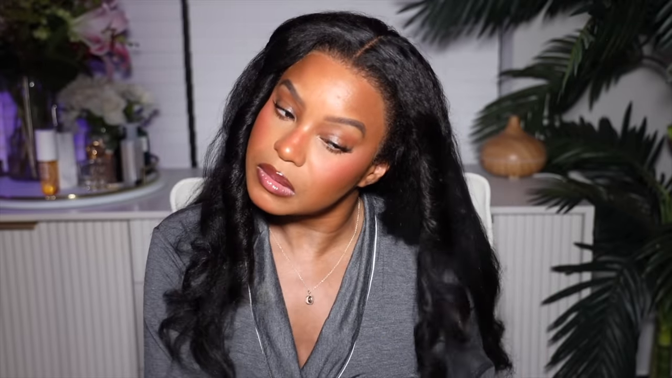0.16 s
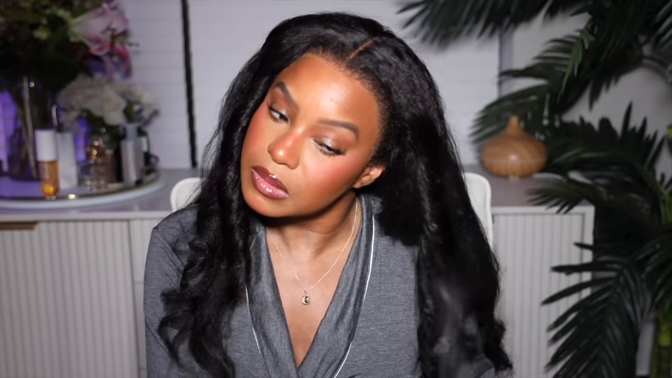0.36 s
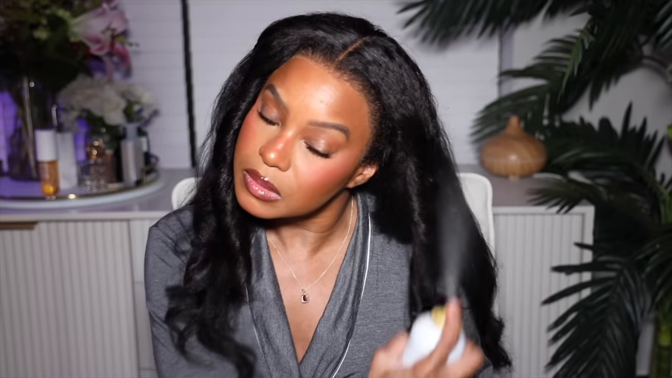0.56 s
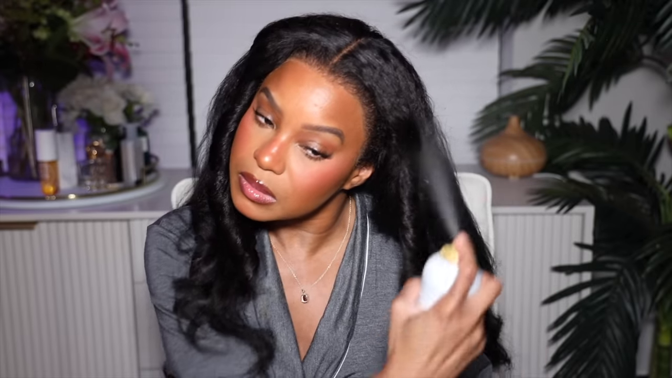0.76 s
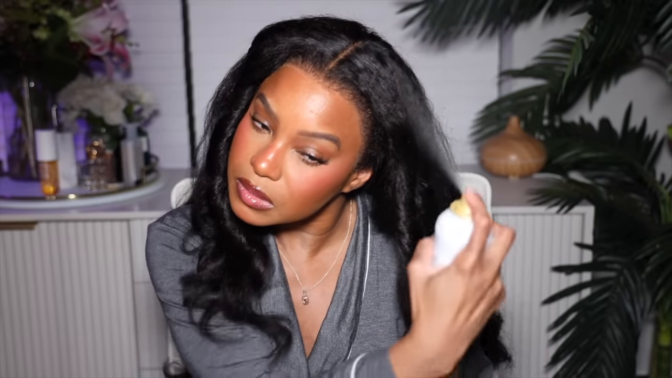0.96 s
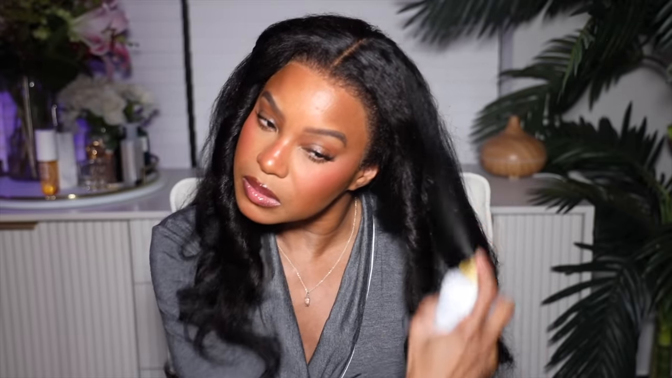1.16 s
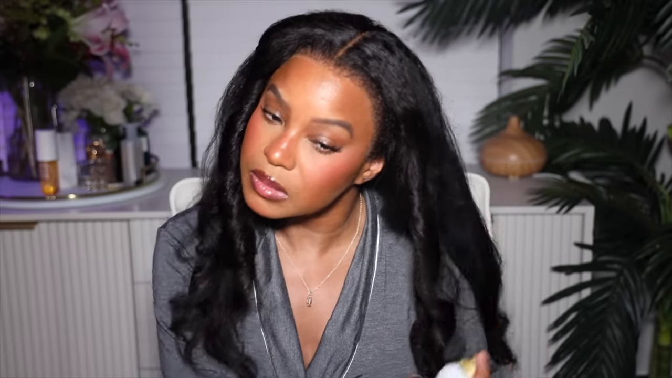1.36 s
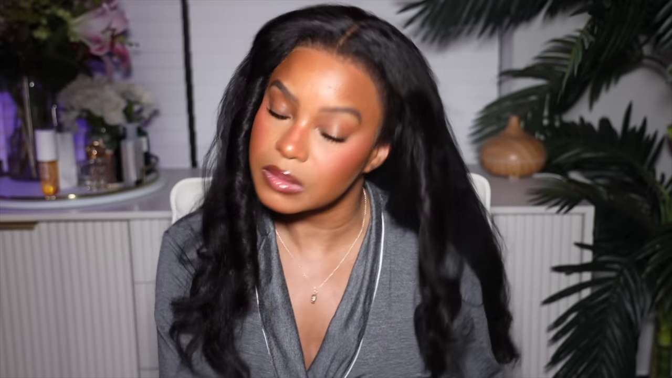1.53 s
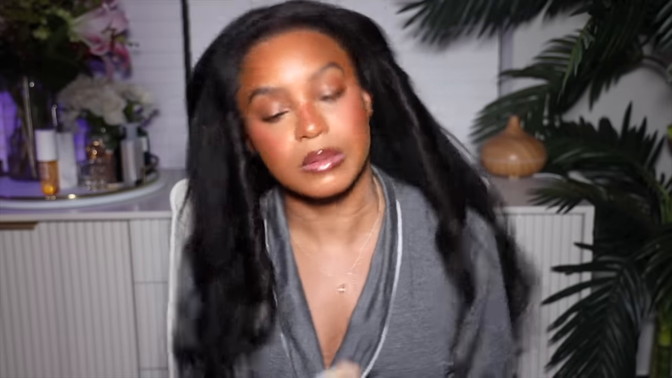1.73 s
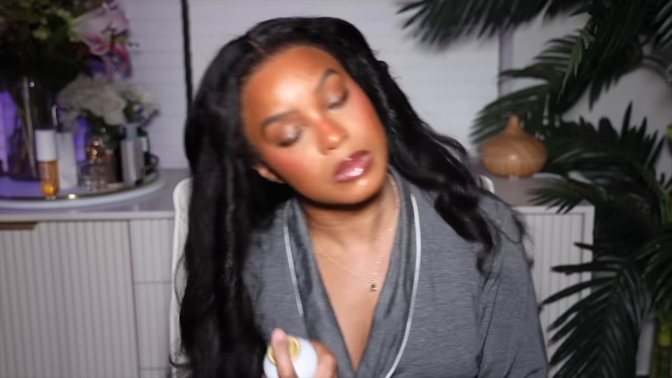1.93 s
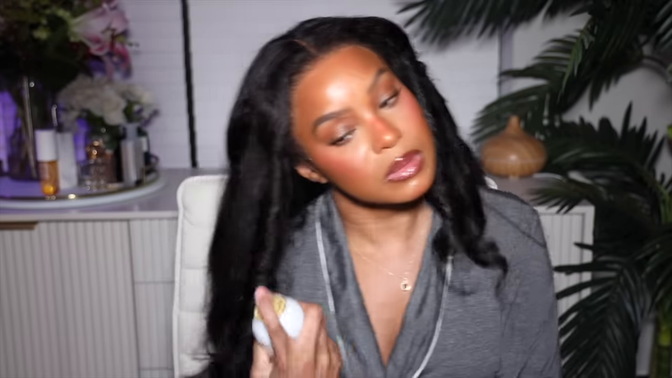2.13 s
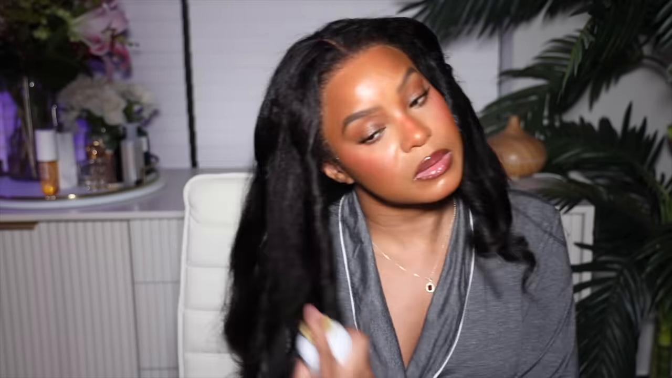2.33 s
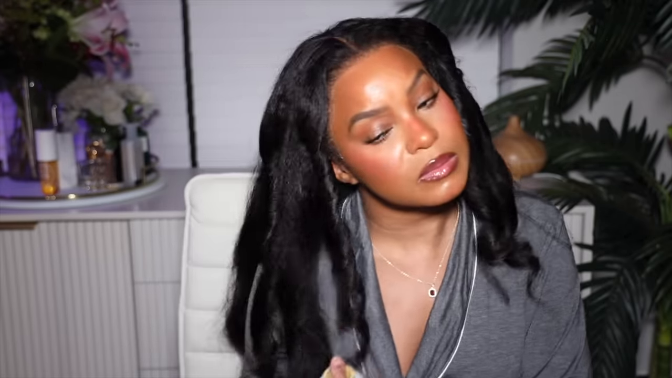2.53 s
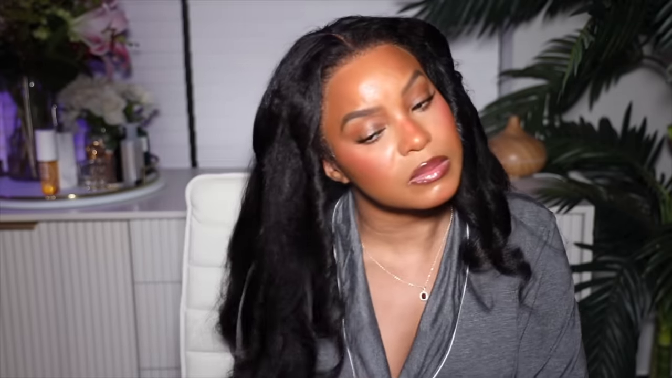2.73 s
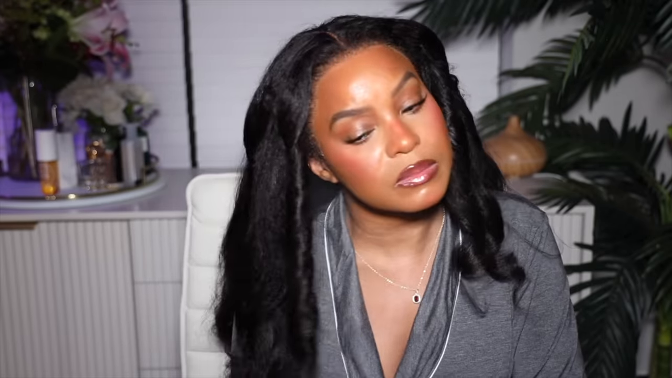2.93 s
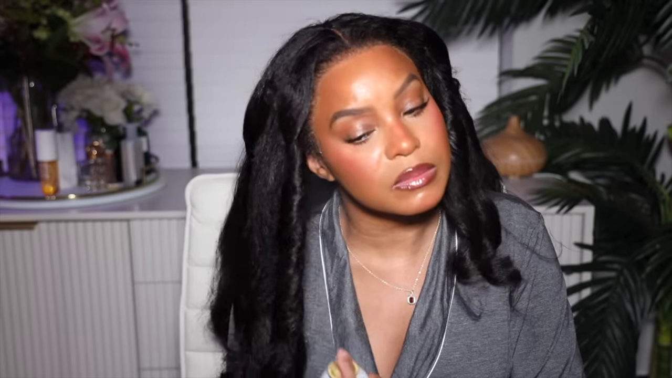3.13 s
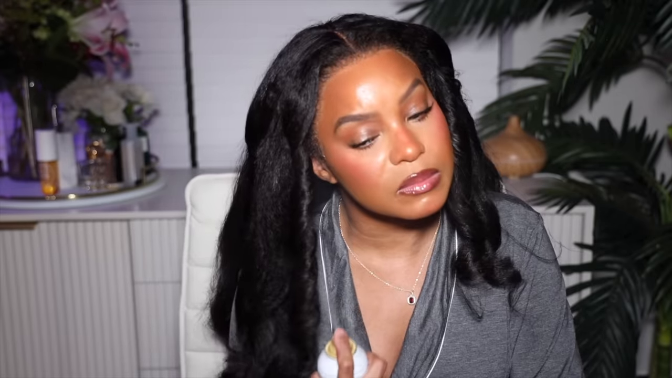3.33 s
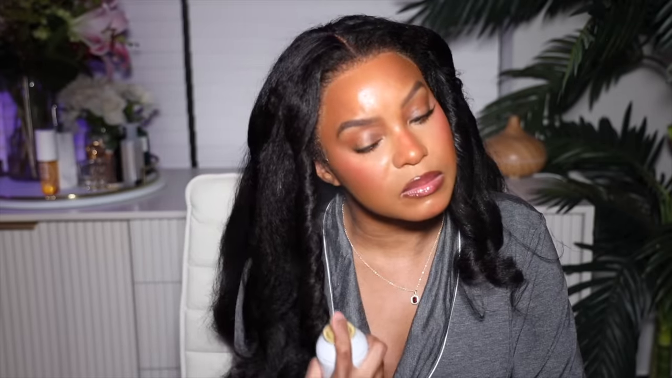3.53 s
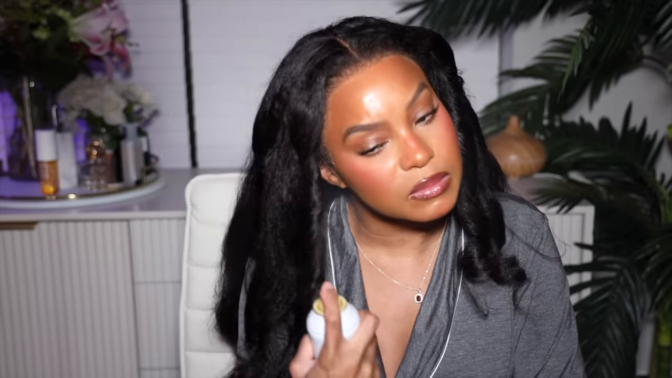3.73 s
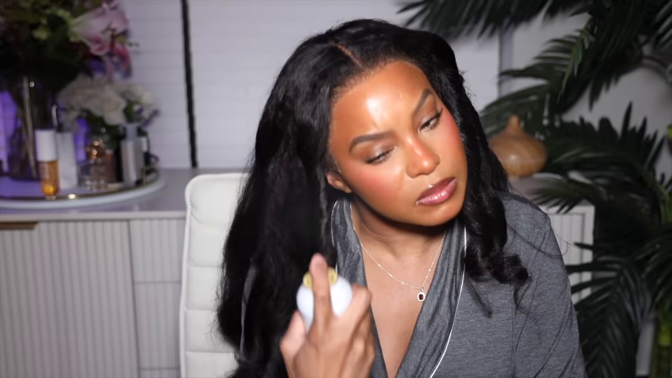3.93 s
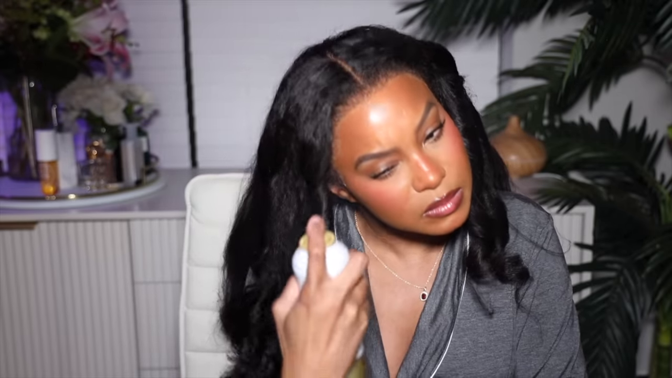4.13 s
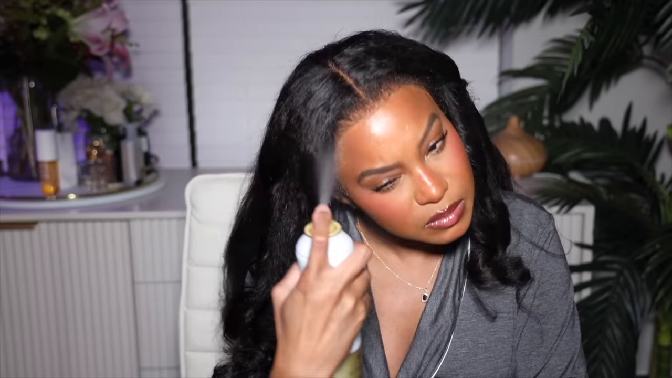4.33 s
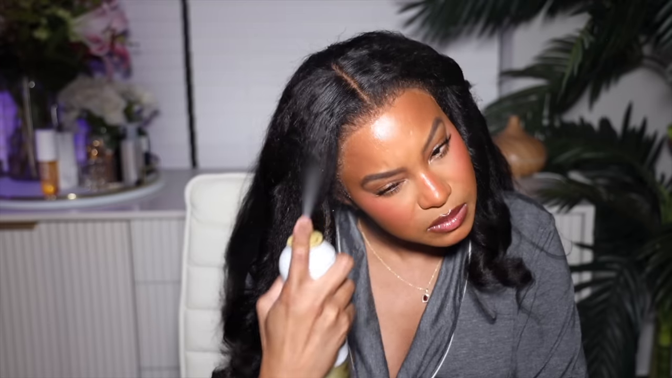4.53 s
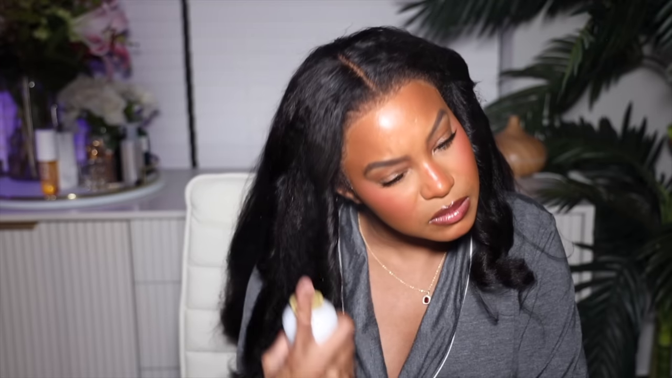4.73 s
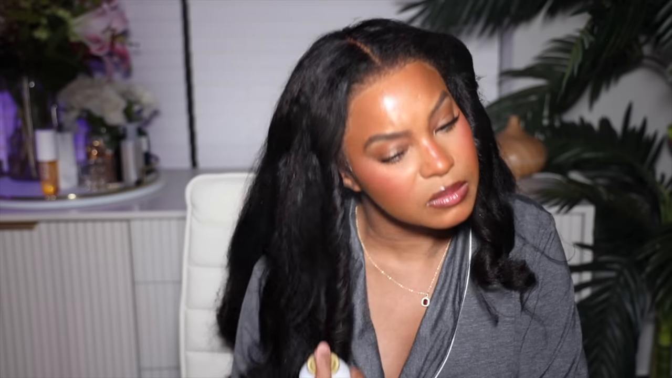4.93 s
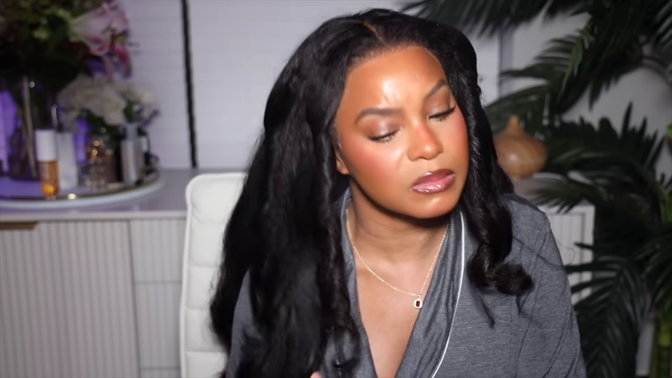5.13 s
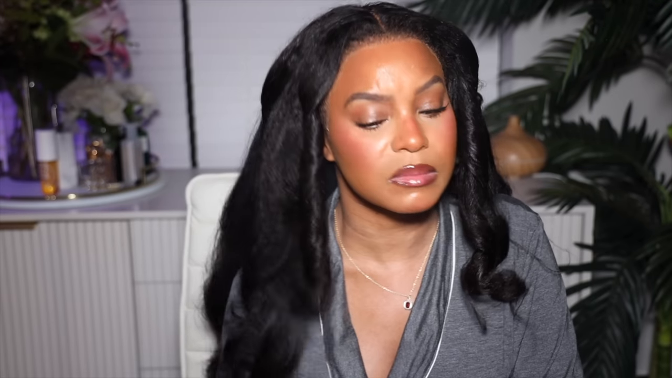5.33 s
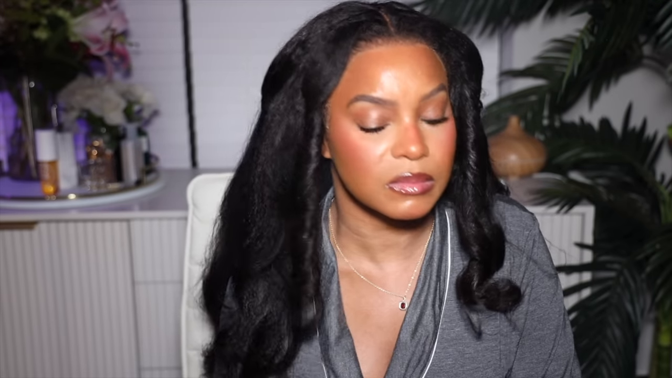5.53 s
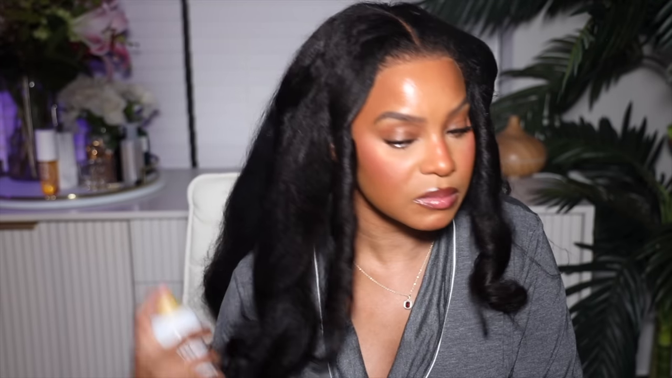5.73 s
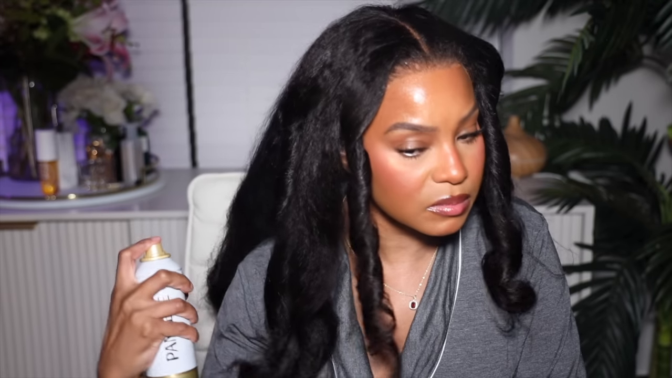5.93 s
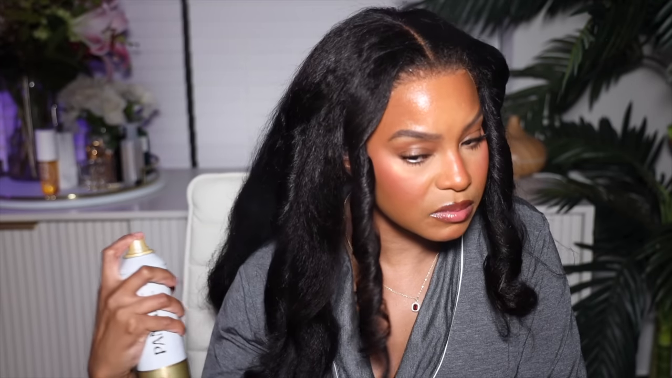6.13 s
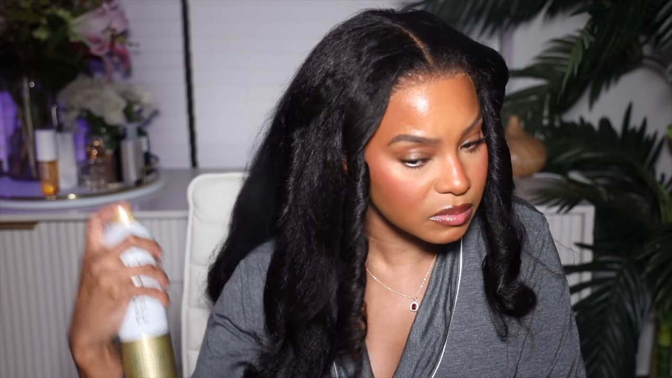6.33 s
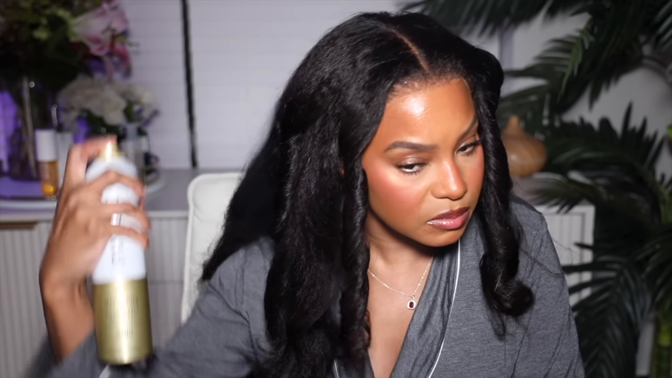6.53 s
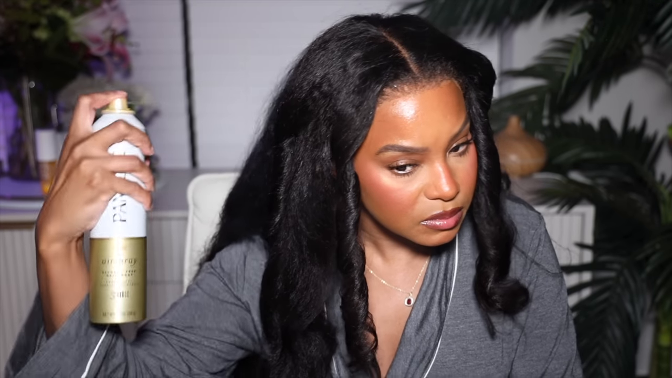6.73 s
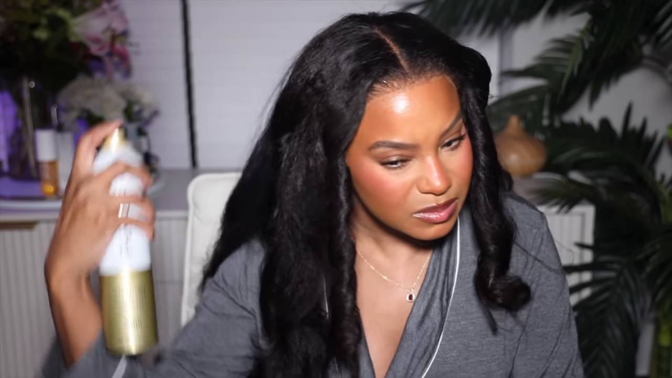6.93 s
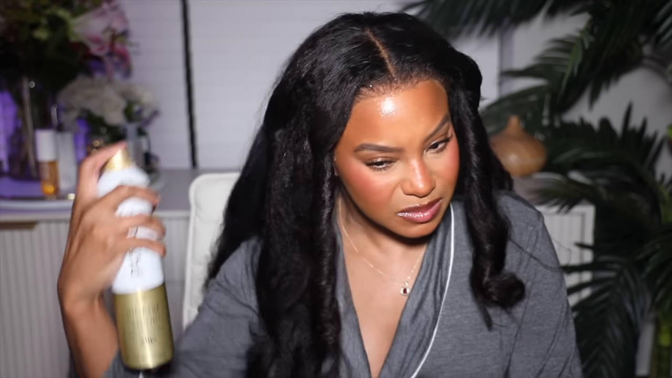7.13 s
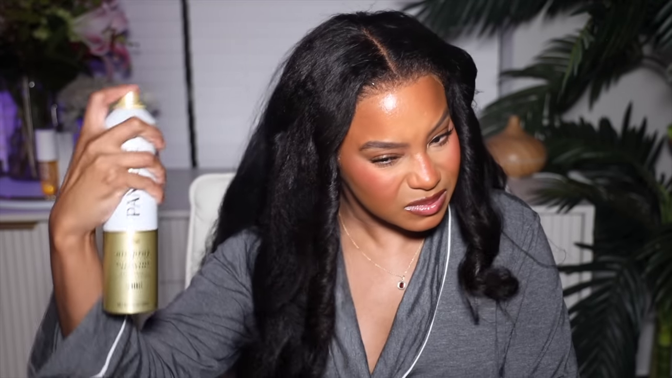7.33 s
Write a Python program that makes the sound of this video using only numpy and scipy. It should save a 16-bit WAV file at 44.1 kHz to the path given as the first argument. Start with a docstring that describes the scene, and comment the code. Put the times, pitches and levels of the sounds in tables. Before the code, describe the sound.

An aerosol can of hairspray fires a run of short, bright hissing bursts, about four a second. In a pause, hair and cloth rustle and the can bumps and clinks as it changes hands. The cap clicks and a longer run of bursts follows, then a brief gap and a last, slightly throatier run. The sound is close and mono, in a small room with a faint low hum.

```python
"""Hairspray in a small room

Short bursts, close and in mono. Each press cracks the valve to a thin hiss and opens it to a roaring jet,
trailed by a quieter hiss; near reflections sweep as the can moves. Hair and robe rustle, the plastic cap
clicks, and after the first of three runs the can clinks as it changes hands."""
import sys
import numpy as np
from scipy import signal
from scipy.fft import rfft, irfft, next_fast_len
from scipy.io import wavfile
from scipy.ndimage import map_coordinates

SR = 44100
rng = np.random.default_rng(int(sys.argv[2]) if len(sys.argv) > 2 else 0)


def store_wav(level_fs):
    """Save 16-bit WAV to argv[1]."""
    pcm = np.round(np.clip(np.atleast_2d(level_fs), -1, 1) * 32767)
    wavfile.write(sys.argv[1], SR, pcm.T.astype(np.int16))


N = 329427
TIME_S = np.arange(N) / SR
AGE_S = TIME_S[:SR // 2]  # clock of one event


def undb(db):
    """Decibels to gain."""
    return 10 ** (np.asarray(db) / 20)


def unit_rms(x):
    """Scale to an rms of one."""
    return x / np.sqrt(np.mean(x ** 2))


def highpass(hz, order=2):
    """Butterworth high-pass sections."""
    return signal.butter(order, hz, "high", fs=SR, output="sos")


def add(track, start_s, sound):
    """Mix a short sound into a track."""
    part = track[int(start_s * SR):][:len(sound)]
    part += sound[:len(part)]


def noise(spectrum, size=N):
    """Unit-rms noise shaped by rows of freq_hz, density_db."""
    freq_hz, density_db = np.transpose(spectrum)
    padded = next_fast_len(size, True)
    bin_hz = np.arange(padded // 2 + 1) * SR / padded
    gain = undb(np.interp(np.log(bin_hz + 1), np.log(freq_hz), density_db))
    return unit_rms(irfft(rfft(rng.standard_normal(padded)) * gain, padded)[:size])


def wander(rate_hz):
    """Smooth random drift, unit rms."""
    return unit_rms(np.interp(TIME_S * rate_hz, np.arange(N), rng.standard_normal(N)))


def gate(start_s, hold_s, rise_s, fall_s):
    """Event envelope: opens, holds, dies away."""
    attack = 1 - np.exp(-np.maximum(AGE_S - start_s, 0) / rise_s)
    return attack * np.exp(-np.clip((AGE_S - start_s - hold_s) / fall_s, 0, 20))


def mode(hz, t60_s):
    """One struck mode."""
    return np.sin(2 * np.pi * hz * AGE_S) * np.exp(-np.log(1000) * AGE_S / t60_s)


def resonance(hz, width_hz, size=len(AGE_S)):
    """Steep-sided resonance driven by noise, unit rms."""
    b, a = signal.iirpeak(hz, hz / width_hz, fs=SR)
    return unit_rms(signal.lfilter(b, a, signal.lfilter(b, a, rng.standard_normal(size))))


# background spectrum: freq_hz, density_db
ROOM_SPECTRUM = [(20, -46), (35, -32), (58, -8), (70, -17), (83, 2.5), (100, -20), (122, 0), (160, -6.5),
                 (220, 3.5), (330, -7), (600, -10), (1400, -18.5), (5000, -25.5), (16000, -33)]
def room_tone(level_db=-42):
    """Low, slightly wavering background."""
    return undb(level_db + wander(12)) * noise(ROOM_SPECTRUM)


# reverberation: freq_hz, t60_s, level_db
WALL_DECAY = [(200, 0.2, -2.5), (1020, 0.4, -6.5), (2410, 0.62, -11), (4400, 0.69, -9.5),
              (8000, 0.42, -10.5), (15000, 0.34, -12)]
def wall_response(gap_s=0.01):
    """Diffuse tail from the walls; the lower treble rings longest."""
    freq_hz, t60_s, level_db = np.transpose(WALL_DECAY)
    edges_hz = np.geomspace(80, 18000, 12)
    age_s, out = TIME_S[:SR], 0
    for low_hz, high_hz in zip(edges_hz, edges_hz[1:]):
        bandpass = signal.butter(4, [low_hz, high_hz], "band", fs=SR, output="sos")
        band = signal.sosfilt(bandpass, rng.standard_normal(SR))
        log_centre = np.log(low_hz * high_hz) / 2
        band_t60_s = np.interp(log_centre, np.log(freq_hz), t60_s)
        band_db = np.interp(log_centre, np.log(freq_hz), level_db)
        fade = np.exp(-np.log(1000) * age_s / band_t60_s) * (age_s > gap_s)
        out = out + undb(band_db) * band * fade / np.sqrt(np.sum(fade ** 2))
    return out


def room(x, places=5):
    """The moving can excites the room from different places: direct sound plus crossfaded tails."""
    position = TIME_S / TIME_S[-1] * (places - 1)
    fades = (np.sqrt(np.maximum(1 - np.abs(position - place), 0)) for place in range(places))
    return x + sum(signal.fftconvolve(x * fade, wall_response())[:N] for fade in fades)


# hair on cloth: freq_hz, density_db
RUSTLE_SPECTRUM = [(35, 2), (140, 5.5), (400, 3), (1000, 3), (1900, 2), (2600, -1.5), (4200, -1),
                   (6500, -11), (15000, -19.5)]
# head and arm movements: centre_s, half_length_s, level_db
MOVEMENTS = [(.4, 2.2, -40), (2.245, 0.34, -34), (2.35, 0.062, -28), (2.886, 0.6, -35.5), (7.05, 1.1, -40)]
def rustle(grain_db=1.5, stroke_db=1.0, rest_db=-57):
    """Hair slides over cloth in small uneven catches, swelling with each movement."""
    swells = (undb(db) * np.exp(-((TIME_S - centre_s) / half_s) ** 2)
              for centre_s, half_s, db in MOVEMENTS)
    envelope = np.sqrt(undb(rest_db) ** 2 + sum(swell ** 2 for swell in swells))
    return noise(RUSTLE_SPECTRUM) * envelope * undb(grain_db * wander(250) + stroke_db * wander(25))


# handling bumps: start_s, level_db, pitch_hz, t60_s
HAND_KNOCKS = [(1.951, -12, 654, 0.025), (1.9555, -12.5, 490, 0.044), (1.976, -41, 470, 0.049),
               (1.997, -22, 510, 0.068), (2.168, -16, 990, 0.021), (2.220, -11, 610, 0.006),
               (2.392, -7.5, 520, 0.01)]
def knocks(overtone_ratio=1.93, overtone_db=-5, low_cut_hz=260):
    """Soft, hand-damped bumps with one brief overtone and little bass."""
    out = np.zeros(N)
    for start_s, level_db, pitch_hz, t60_s in HAND_KNOCKS:
        overtone = undb(overtone_db) * mode(pitch_hz * overtone_ratio, t60_s / 2)
        add(out, start_s, undb(level_db) * (mode(pitch_hz, t60_s) + overtone))
    return signal.sosfilt(highpass(low_cut_hz), out)


# cap snaps: start_s, level_db, pitch_hz
CAP_CLICKS = [(2.4297, -1, 9800), (5.775, -27.5, 2400), (6.985, -17, 2630), (7.127, -16, 8700)]
def cap_clicks(fall_s=0.0016):
    """The plastic cap snaps under the finger, exciting one broad resonance."""
    out = np.zeros(N)
    for start_s, level_db, pitch_hz in CAP_CLICKS:
        add(out, start_s, undb(level_db) * gate(0, 0, 0.00043, fall_s) * resonance(pitch_hz, pitch_hz / 2))
    return out


# strikes on the can: start_s, level_db
CAN_STRIKES = [(2.2913, -2.5), (2.2951, 5.5), (2.296, -10), (2.3008, -4)]
# contact noise: freq_hz, density_db
CRACK_SPECTRUM = [(100, -25), (500, 9), (2000, 14), (6500, 14), (9000, -2), (16000, -6)]
# wall modes: pitch_hz, level_db, t60_s
CAN_MODES = [(1308, -26, .3), (2132, -25, .15), (3920, -23, .42), (5600, -30, .25), (7628, -39, .2),
             (8450, -41, .3)]
def clinks(crack_db=-5, crack_s=0.0016, buzz_width_hz=300):
    """Hard contacts in quick succession; the thin metal wall rings, buzzing unevenly in the hand."""
    out = np.zeros(N)
    for start_s, level_db in CAN_STRIKES:
        crack = gate(0, 0, 0.0001, crack_s) * noise(CRACK_SPECTRUM, len(AGE_S))
        add(out, start_s, undb(level_db + crack_db) * crack)
    wall = sum(undb(db) * gate(0, 0, 0.0015, t60_s / np.log(1000)) * resonance(hz, buzz_width_hz)
               for hz, db, t60_s in CAN_MODES)
    add(out, CAN_STRIKES[0][0], wall)
    return out


def thump(level_db=-22, fall_s=0.043, body_hz=165, width_hz=350):
    """The hand takes the can's weight as it clinks."""
    out = np.zeros(N)
    body = gate(0, 0, 0.0025, fall_s) * resonance(body_hz, width_hz)
    add(out, CAN_STRIKES[0][0], undb(level_db) * body)
    return out


# can height as reflection lag, longer when raised: time_s, lag_ms
CAN_PATH = [(.05, .73), (.3, .74), (.7, 1.21), (.97, 1.36), (1.48, .92), (2.45, .86), (3.05, .57),
            (3.65, .93), (4.25, 1.56), (4.6, 1.44), (5.06, .8), (5.4, .61), (6.0, .87), (6.3, .87),
            (6.65, 1.38), (7.3, 1.39)]
def reflection_lag_ms():
    """The lag follows the can up and down the hair."""
    return np.interp(TIME_S, *np.transpose(CAN_PATH))


def delay(x, lag_ms):
    """Delay by a moving lag."""
    return map_coordinates(x, [np.arange(N) - lag_ms * SR / 1000], order=3)


def near_reflections(x, low_hz=1100, split_hz=3000, head_lag_ratio=0.373):
    """Small nearby surfaces return all but the bass: a comb that glides as the can moves."""
    lag_ms = reflection_lag_ms()
    treble = signal.sosfiltfilt(highpass(split_hz), x)
    mids = signal.sosfiltfilt(highpass(low_hz), x) - treble
    # as the can rises, the long path weakens and the short one by the head grows
    far = 0.25 / lag_ms ** 1.5 * delay(treble, lag_ms) + 0.21 / lag_ms * delay(mids, lag_ms)
    head = 0.091 * np.clip(lag_ms - 0.5, 0, 1) * delay(treble, head_lag_ratio * lag_ms)
    return x + far + head


TRAIL_S = 0.037  # brief, quieter hiss trailing each jet
# nozzle presses: start_s, half_open_s, full_open_s, hiss_db, roar_db, hollow_db
NOZZLE_PRESSES = [(.046, 0.018, .12, -19, -24.5, -29.5), (.311, 0.021, 0.08, -18, -22.5, -39),
                  (.523, 0.013, 0.11, -17.5, -21.5, -35), (.745, 0.014, 0.11, -16.5, -21, -23),
                  (.975, 0.014, 0.1, -16.5, -22, -23.5), (1.195, 0.02, .099, -18, -22.5, -33),
                  (1.411, 0.022, 0.085, -18.5, -22, -29), (2.427, .034, 0.13, -14.5, -27, -25),
                  (2.802, 0.016, .12, -15, -23, -45), (3.106, .022, 0.061, -16, -22, -40),
                  (3.344, 0.017, 0.072, -14.5, -19.5, -42), (3.596, 0.019, 0.069, -15.5, -22, -27),
                  (3.848, 0.027, 0.071, -16.5, -21.5, -30), (4.31, 0.028, 0.055, -14, -17, -24),
                  (4.548, 0.021, 0.075, -14.5, -17.5, -34), (4.793, 0.029, .073, -17.5, -23, -32),
                  (5.032, 0.013, 0.12, -15, -27.5, -27), (5.295, 0.035, 0.061, -17.5, -25.5, -28),
                  (5.979, 0.021, 0.12, -13, -21.5, -30), (6.264, 0.022, 0.062, -13, -22.5, -30),
                  (6.533, 0.021, 0.081, -12.5, -20, -24), (6.768, 0.019, 0.078, -13.5, -19.5, -26.5),
                  (7.247, 0.025, .098, -13, -20, -26)]
# half presses that only sputter: start_s, length_s, level_db
HALF_PRESSES = [(4.116, 0.022, -28), (4.147, 0.0089, -22.5), (4.169, 0.0069, -25), (5.53, 0.0067, -53)]
def valve(leak_db=-2, trail_db=-7.5, sag_db=3.5, jolt_s=2.3, surge_db=7.5, settle_s=1.0):
    """Spray envelopes: gas leaks once the valve cracks, and roars and rings only at full flow."""
    leak, hiss, roar, hollow = np.zeros((4, N))
    spit = 1 + 0.8 * gate(0, 0.003, 0.0005, 0.002)  # gas trapped in the stem leaves first
    for start_s, half_open_s, full_open_s, hiss_db, roar_db, hollow_db in NOZZLE_PRESSES:
        # after the can is jolted, jets start with a surge until the liquid settles
        agitation = np.exp(-(start_s - jolt_s) / settle_s) * (start_s > jolt_s)
        surge = agitation * gate(half_open_s, 0.004, 0.0018, 0.01)
        progress = np.clip((AGE_S - half_open_s) / full_open_s, 0, 1)
        flow = undb(surge_db * surge + sag_db * (0.5 - progress))
        jet = gate(half_open_s, full_open_s, 0.0054, 0.0056) * flow
        trail = undb(trail_db) * gate(half_open_s + full_open_s, TRAIL_S, 0.0075, 0.013)
        add(leak, start_s, undb(hiss_db + leak_db) * spit * gate(0, half_open_s, 0.0049, 0.025))
        add(hiss, start_s, undb(hiss_db) * np.hypot(jet, trail))
        add(roar, start_s, undb(roar_db) * jet)
        add(hollow, start_s, undb(hollow_db) * jet)
    for start_s, length_s, level_db in HALF_PRESSES:
        add(hiss, start_s, undb(level_db) * gate(0, length_s, 0.00045, 0.004))
    return leak, hiss, roar, hollow


# orifice noise: freq_hz, density_db
HISS_SPECTRUM = [(100, -17), (900, -6.5), (1800, 1.5), (2400, 1), (2850, -2), (4000, 3.5), (5300, -1.5),
                 (8000, 1), (10500, 1), (13000, -0.5), (16000, -2)]
def orifice_hiss(leak, hiss, aside, thin_hz=2900, treble_hz=9000, dull_db_per_ms=2.5, aside_db=-6.5):
    """Bright hiss and a thinner leak; both lose treble when the can is raised or held aside."""
    air = hiss * noise(HISS_SPECTRUM)
    air += leak * signal.sosfilt(highpass(thin_hz, order=1), noise(HISS_SPECTRUM))
    treble_db = 1.5 - dull_db_per_ms * (reflection_lag_ms() - 1) + aside_db * aside
    return air + (undb(treble_db) - 1) * signal.sosfiltfilt(highpass(treble_hz), air)


def dribble(softest_db=-33, range_db=8, window_s=0.24, fall_s=0.0022, spits=3):
    """Liquid left in the nozzle spits a few times after each press."""
    impulses = np.zeros(N)
    for start_s, half_open_s, full_open_s, *_ in NOZZLE_PRESSES:
        end_s = start_s + half_open_s + full_open_s + TRAIL_S
        for when, strength in rng.random((spits, 2)):
            sample = min(int((end_s + when * window_s) * SR), N - 1)
            impulses[sample] += undb(softest_db + range_db * strength)
    envelope = signal.lfilter([1], [1, -np.exp(-1 / (fall_s * SR))], impulses)
    return envelope * noise(HISS_SPECTRUM)


# liquid breaking up in the jet: freq_hz, density_db
ROAR_SPECTRUM = [(80, -14.5), (250, -11.5), (500, -10.5), (760, -6.5), (1200, -3), (1700, -3.5),
                 (2200, 0.5), (2800, -14.5), (3300, -8.5), (3900, -2), (5000, -8), (6200, -5),
                 (8000, -21.5), (15000, -47)]
def spray(flutter_db=0.37, spatter_db=2.5, aside_s=5.7, puff_db=-6):
    """Orifice hiss, the grainy roar of liquid breaking up, and the jet's hollow ring."""
    leak, hiss, roar, hollow = valve()
    aside = TIME_S > aside_s  # last run: can held to the side, a throaty puff replaces the treble
    air = orifice_hiss(leak, hiss, aside)
    ring = hollow * resonance(hz=2340, width_hz=350, size=N)
    puff = undb(puff_db) * aside * resonance(hz=700, width_hz=1000, size=N)
    breakup = noise(ROAR_SPECTRUM) * undb(spatter_db * wander(900))
    return undb(flutter_db * wander(170)) * (air + roar * (breakup + puff) + ring)


def scene():
    """Spray and handling in the room, over rustle and room tone."""
    handling = clinks() + thump() + knocks() + cap_clicks()
    aerosol = near_reflections(spray() + dribble())
    mono = room(aerosol + handling) + rustle() + room_tone()
    return np.array([mono, mono])


def record(dry, low_cut_hz=42, top_hz=15850):
    """Roll off the deepest bass, clip at full scale, cut the top."""
    clipped = np.clip(signal.sosfilt(highpass(low_cut_hz), dry), -1, 1)
    return signal.sosfilt(signal.ellip(12, 0.1, 80, top_hz, fs=SR, output="sos"), clipped)


dry = scene()
out = record(dry)
store_wav(out)
```